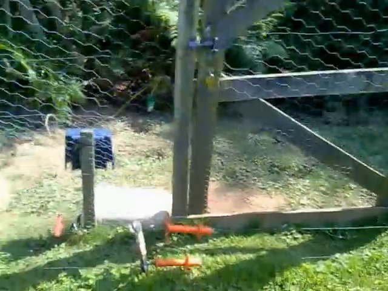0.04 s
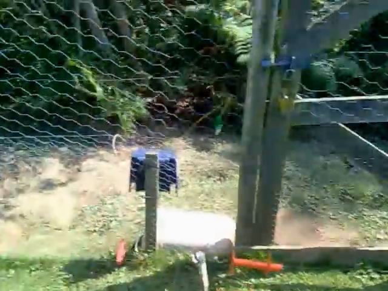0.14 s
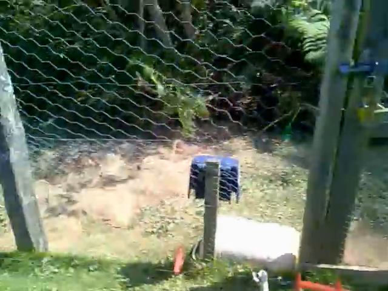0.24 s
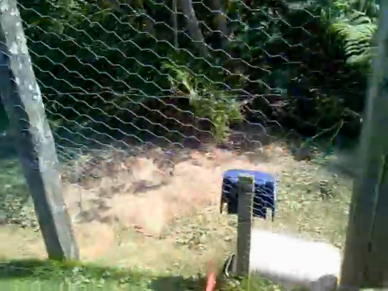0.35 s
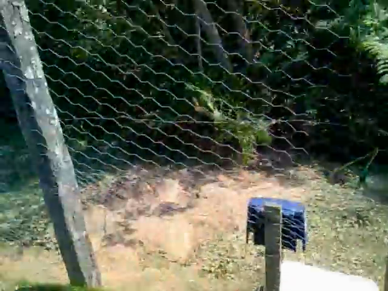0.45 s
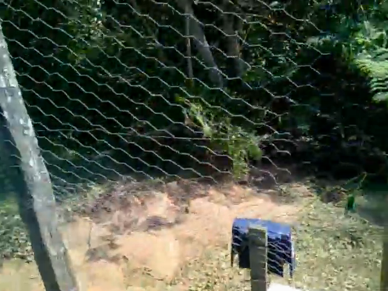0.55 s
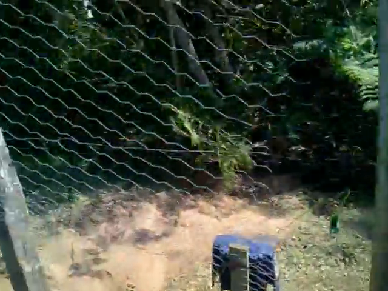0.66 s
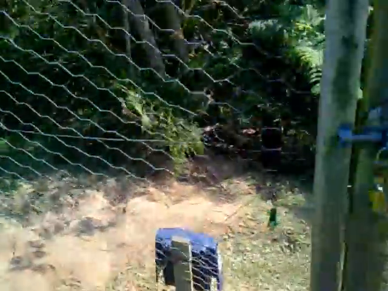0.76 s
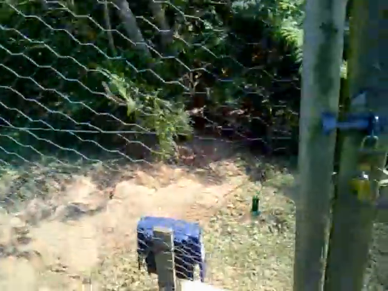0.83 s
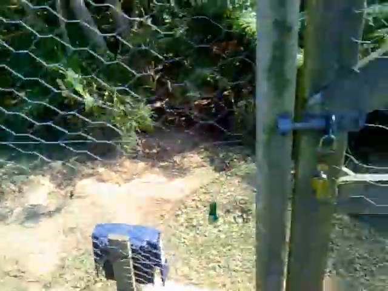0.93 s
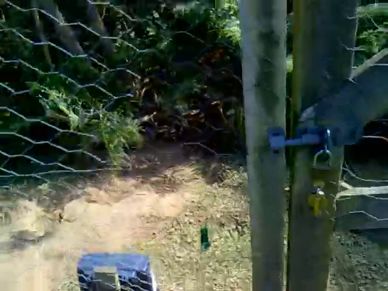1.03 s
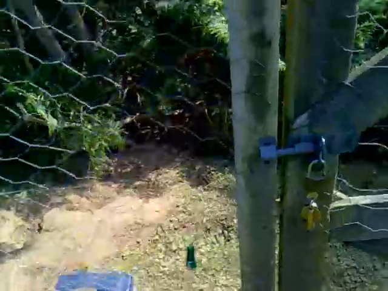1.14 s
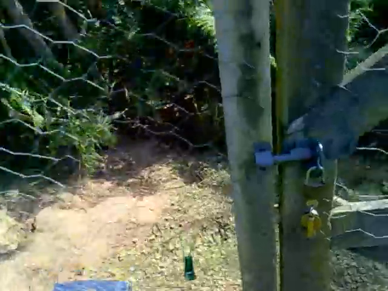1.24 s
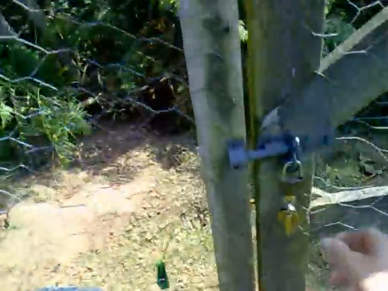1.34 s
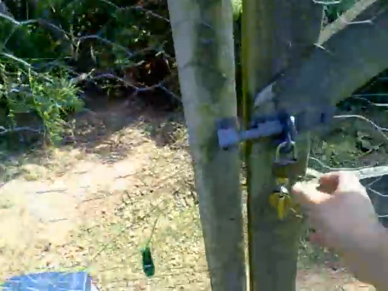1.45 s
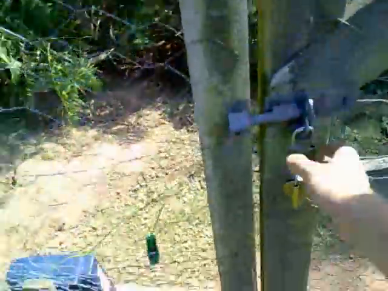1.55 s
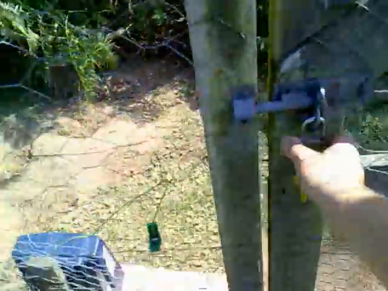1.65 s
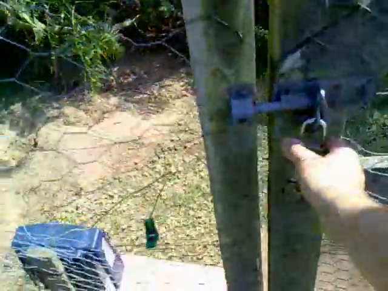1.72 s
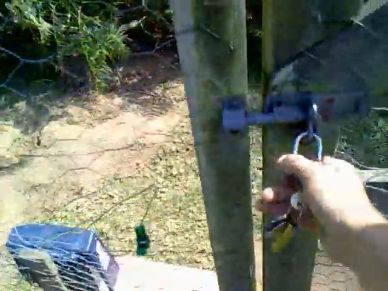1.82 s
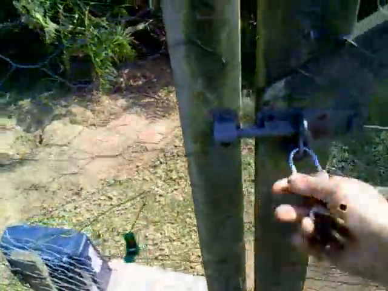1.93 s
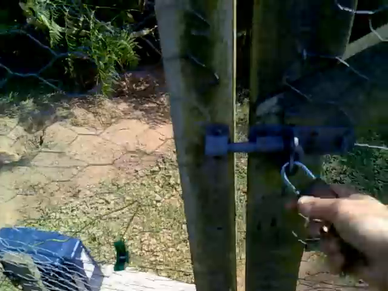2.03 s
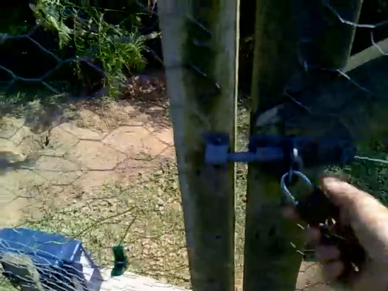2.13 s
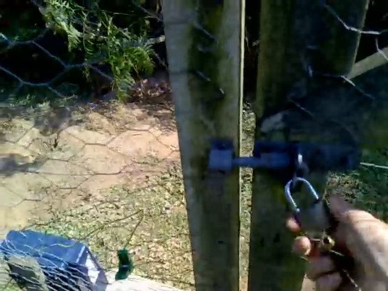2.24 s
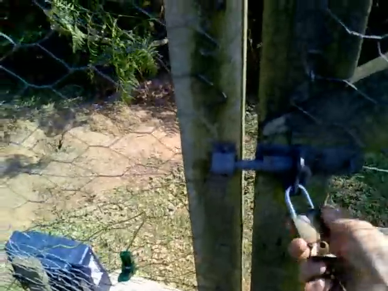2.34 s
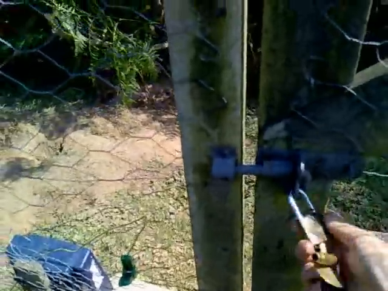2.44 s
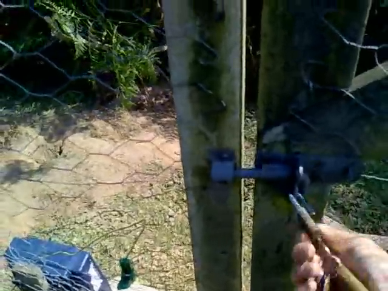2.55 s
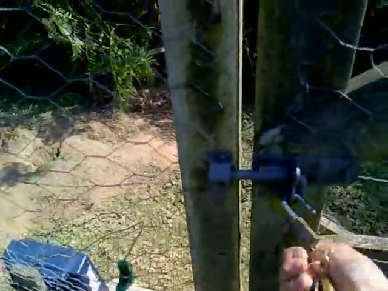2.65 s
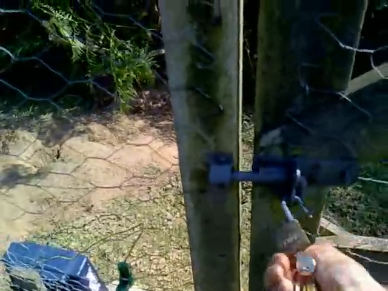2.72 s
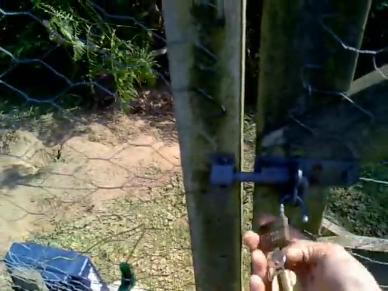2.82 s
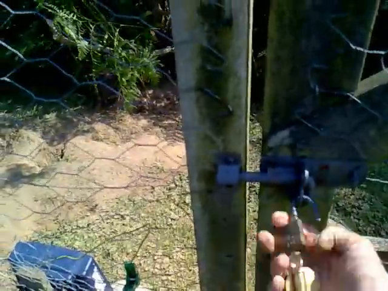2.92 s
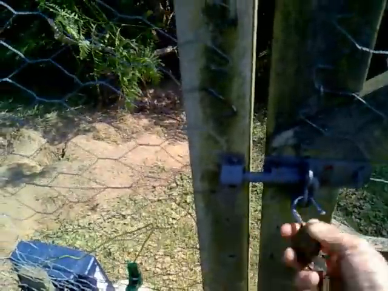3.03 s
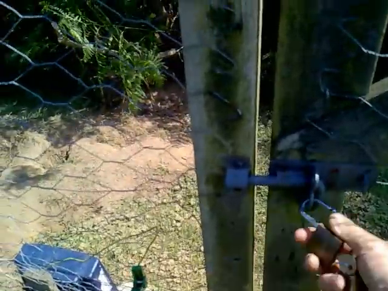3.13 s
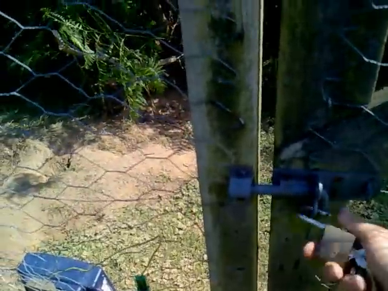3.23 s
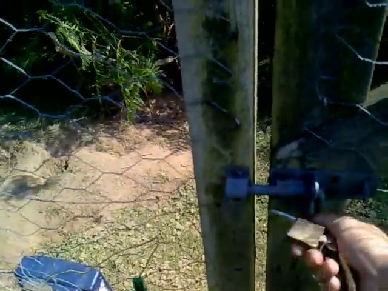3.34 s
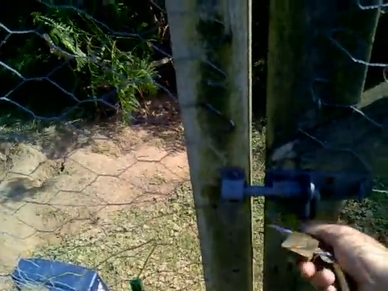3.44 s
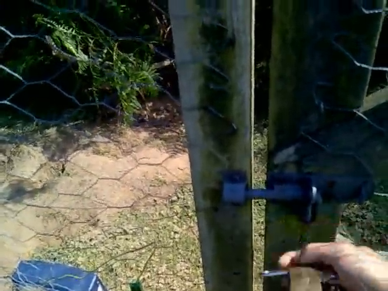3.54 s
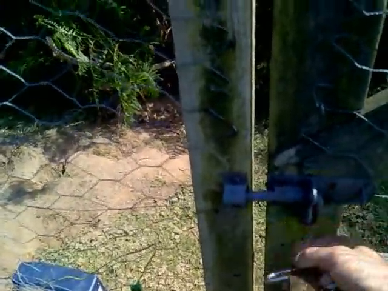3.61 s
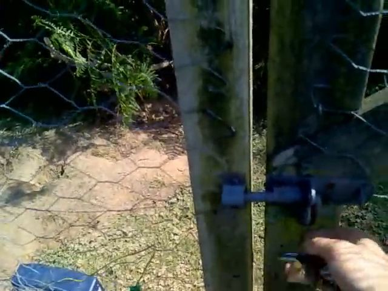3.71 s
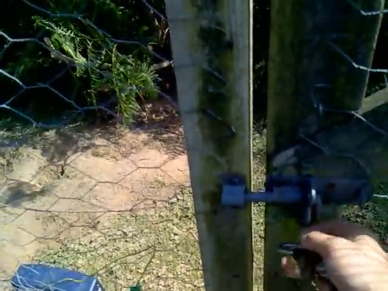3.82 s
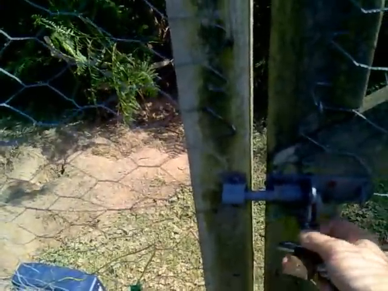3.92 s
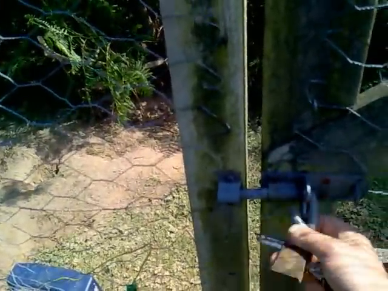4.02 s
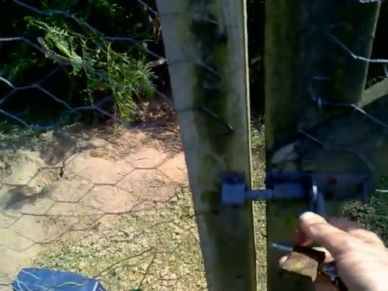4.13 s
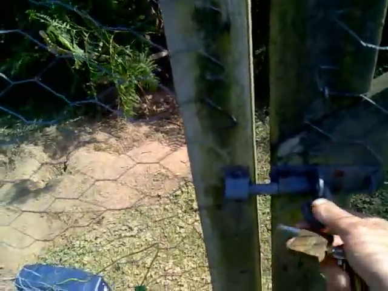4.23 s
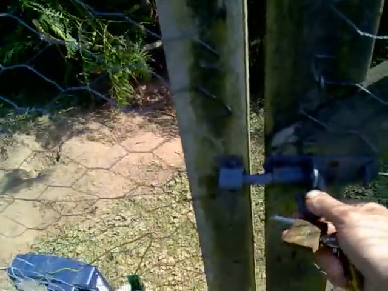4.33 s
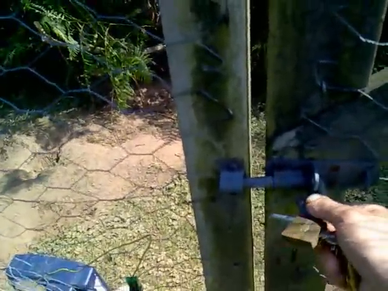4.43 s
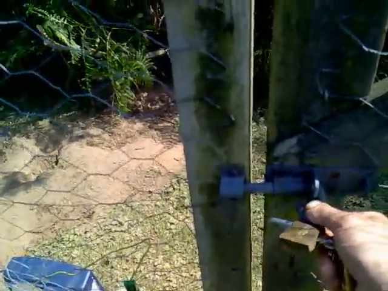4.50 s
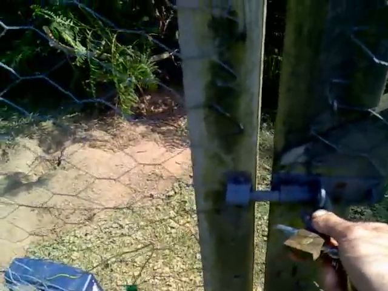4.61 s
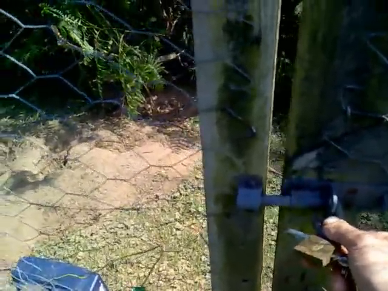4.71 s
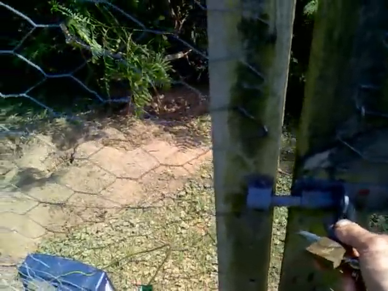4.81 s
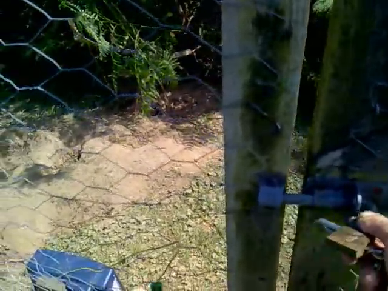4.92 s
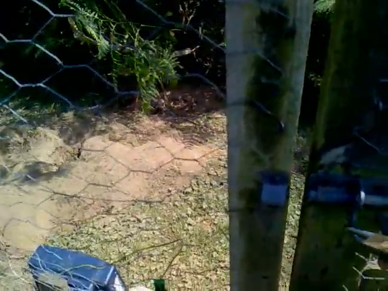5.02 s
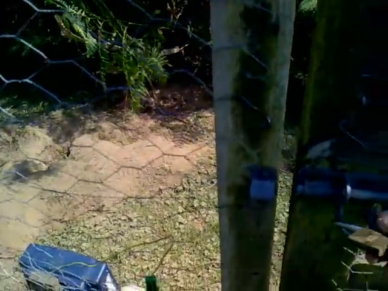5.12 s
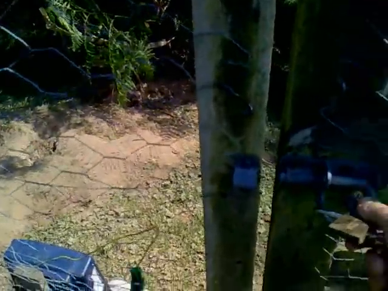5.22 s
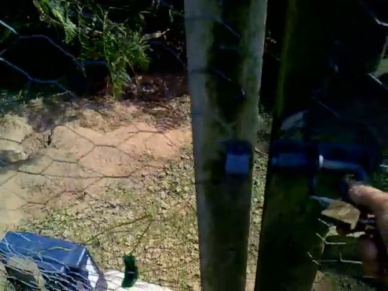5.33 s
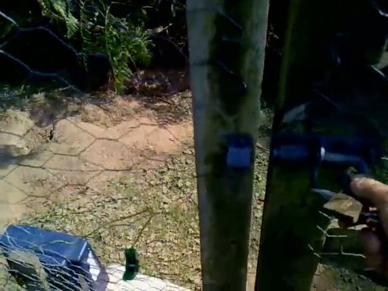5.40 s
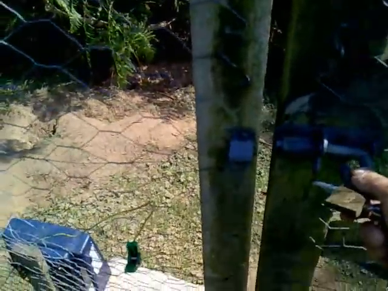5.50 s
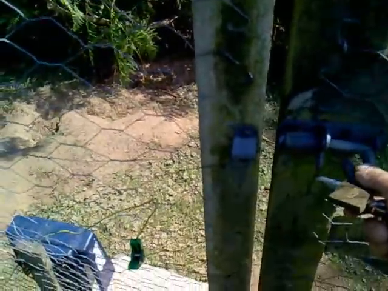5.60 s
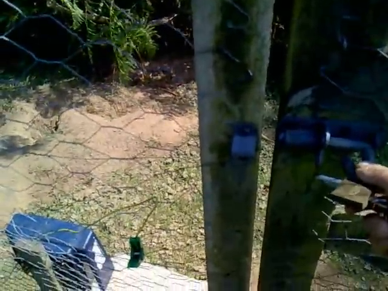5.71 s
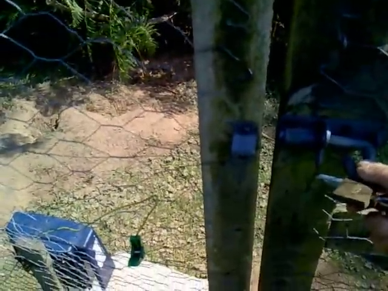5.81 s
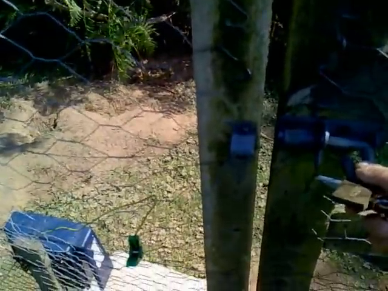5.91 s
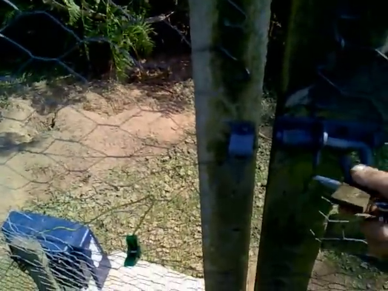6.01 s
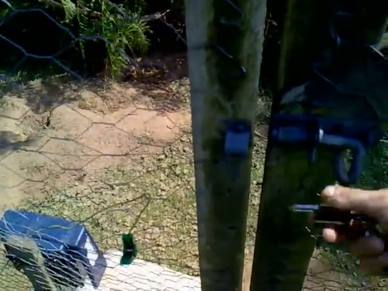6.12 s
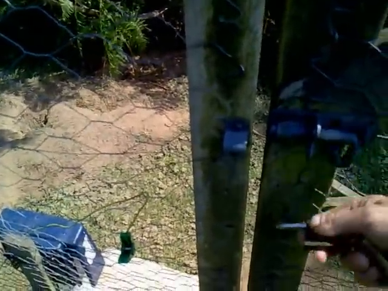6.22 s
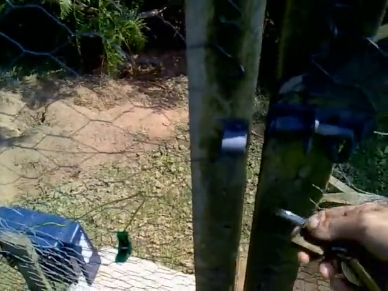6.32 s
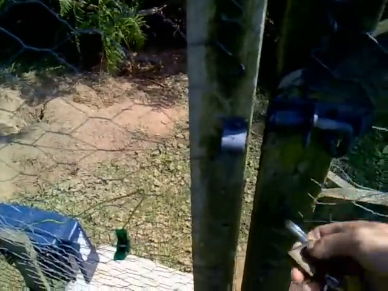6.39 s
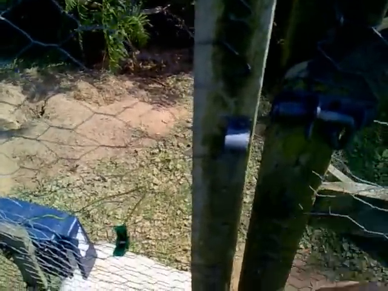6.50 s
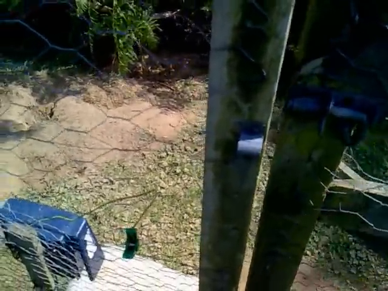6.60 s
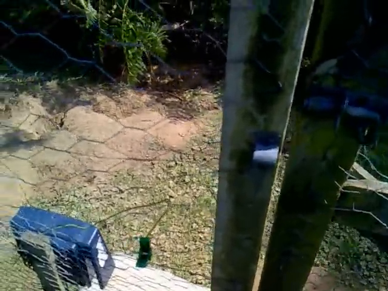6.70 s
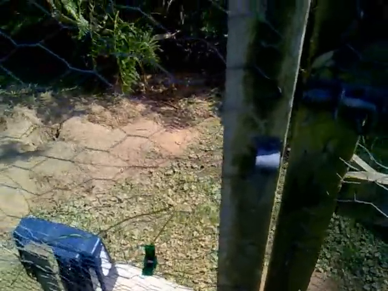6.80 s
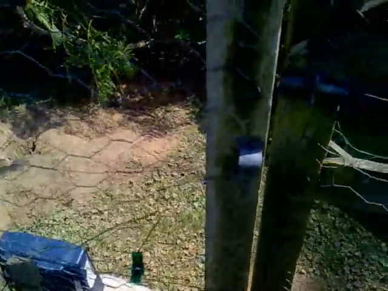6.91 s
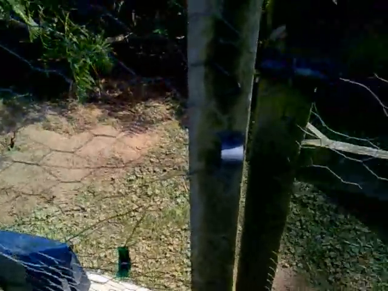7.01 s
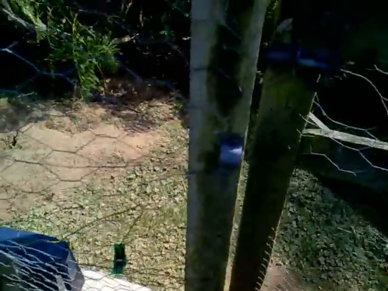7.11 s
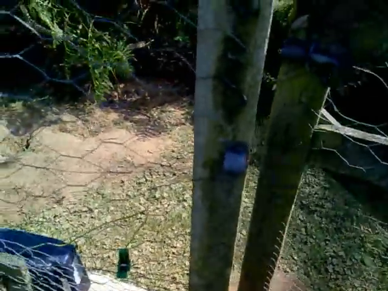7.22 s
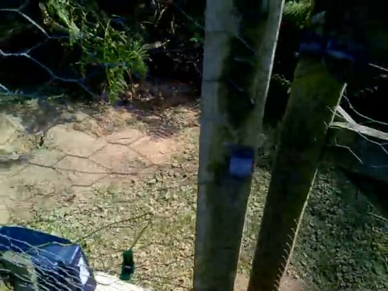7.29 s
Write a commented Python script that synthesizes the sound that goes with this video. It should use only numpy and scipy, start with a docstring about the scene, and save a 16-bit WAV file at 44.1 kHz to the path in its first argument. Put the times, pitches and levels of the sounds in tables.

```python
"""Padlocked garden gate

Someone walks through grass to a wooden gate, unhooks a padlock with dangling keys and slams the bolt open.
Steel knocks and clicks are short cracks over dying modes; steel scrapes and shivers of wire are trains of tiny slips.
The wire netting also buzzes on as noise fed by the energy of each shake.
Shaped noise makes the footsteps, garden hiss and wind; a camera case ticks and a thin whine slides upward."""
import sys
import numpy as np
from scipy import signal
from scipy.fft import rfft, irfft
from scipy.io import wavfile
from scipy.ndimage import uniform_filter1d

SR = 44100
rng = np.random.default_rng(int(sys.argv[2]) if len(sys.argv) > 2 else 0)


def to_wav(sig):
    """Store sig (one row per channel, or 1-D mono) as 16-bit WAV at the path in sys.argv[1].

    Samples outside -1..1 are clipped; the rate is SR.
    """
    pcm = np.clip(np.atleast_2d(sig), -1, 1) * 32767
    pcm = np.round(pcm).astype(np.int16)
    wavfile.write(sys.argv[1], SR, pcm.T)  # frames by channels


N = 324122
T = np.arange(SR // 2) / SR  # time axis of one struck sound, s

# quiet garden hiss, and wind on the microphone: f/Hz, level/dB (per Hz)
HISS_SPECTRUM = [(50, -16.5), (100, -3.5), (160, -13), (250, -3), (420, -8.5), (800, -16), (1300, -16),
                 (2300, -19.5), (5000, -21.5), (12000, -22.5), (16000, -22)]
WIND_SPECTRUM = [(10, -5), (25, 3.5), (60, -4), (100, -15), (170, -28.5), (350, -34), (1000, -69),
                 (4000, -100)]
# puffs of wind hit the microphone: peak t/s, level/dB, time constant of the fall t/s
WIND_PUFFS = [(0.28, -32.5, 0.039), (0.352, -26.5, 0.054), (0.47, -29, 0.035), (0.712, -51.5, 0.072),
              (0.82, -42.5, 0.038), (0.943, -38, 0.077), (1.18, -50.5, 0.084), (1.443, -54, 0.053),
              (2.56, -39.5, 0.0081), (2.668, -37.5, 0.04), (4.438, -55.5, .025), (6.8, -45, .04)]
# light breeze between the puffs: t/s, level/dB
BREEZE_LEVEL = [(1.6, -76), (2.95, -60), (3.96, -79.5), (5.23, -73), (5.62, -76.5), (7.3, -69)]
PUFF_RISE_SHARE = 0.51  # a puff builds faster than it dies

# level of each whine sweep: level/dB
WHINE_LEVELS = [-80, -80, -73.5, -83.5, -82, -91, -82]
WHINE_FIRST_END_S, WHINE_PERIOD_S, WHINE_LENGTH_S = 0.58, 1.178, 0.51

# bolt knocks in its guides: t/s, level/dB (middle band), hardness/dB (treble against middle), clank f/Hz
BOLT_KNOCKS = [(0.124, -60.5, -36.5, 1560), (1.626, -59.5, -44, 1350), (2.0989, -36.5, -12, 2600),
               (2.4297, -48.5, -12, 2070), (2.446, -50, -8, 1131), (2.976, -42.5, -10.5, 1150),
               (3.039, -21, -5, 4400), (3.137, -31, -31.5, 2330), (3.359, -37.5, -15, 2337),
               (3.398, -30, 2, 2267), (3.4358, -40.5, -9, 3344), (3.451, -37.5, -21, 1100),
               (3.474, -46, -30, 1325), (4.0581, -25.5, -17.5, 2355), (4.092, -33, -32, 2450),
               (4.098, -30, -32, 2450), (4.1243, -38, -32, 1790), (4.151, -46, -51, 1380),
               (4.1966, -37, -46, 2500), (4.2743, -39, -36, 2100), (5.018, -53.5, -22.5, 867),
               (5.04, -33.5, -19, 2445), (5.053, -25.5, -19.5, 2293), (5.1126, -9.5, -17, 2296),
               (5.1214, -7, -12, 3443), (5.1265, -7.5, -19.5, 643), (5.137, -14.5, -12, 2400),
               (5.213, -33, -30, 2190), (5.657, -53.5, -12, 1152), (6.2725, -31.5, -10.5, 1134),
               (6.283, -35, -17, 1340), (6.298, -30.5, -14, 1386)]
# modes of the gate: f/Hz, level/dB, t60/s
GATE_MODES = [(434.3, -12.5, 0.12), (627, -9.5, .11), (708, -11, 0.16), (954, -9, .08), (1153, -8, 0.18),
              (1363, -4.5, 0.13), (1510, -13.5, .12), (1900, -15, .15), (2045, -1.5, 0.13), (2220, -4, .1),
              (2439, 2.5, .08), (2810, -14.5, .1), (2940, -15, 0.23), (3120, -15, 0.092),
              (3300, -12.5, .12), (3871, -12.5, 0.034), (6200, -24, .09), (6966, -24, .09),
              (8700, -21, 0.086), (10500, -31.5, .15)]
# crowded resonance of the timber frame: f/Hz, level/dB (per Hz)
TIMBER_SPECTRUM = [(60, -34.5), (150, -26), (280, -15), (420, -2.5), (700, -4.5), (1100, 1.5), (1650, -1),
                   (2400, 3), (3800, -3.5), (5000, -9.5), (8000, -18.5), (12000, -32), (16000, -38)]
# decay of the timber frame: f/Hz, t60/s
FRAME_DECAY = [(150, .16), (500, .13), (1400, 0.12), (3700, 0.064), (10000, 0.033)]
# timber bass against the knock's strength: more for a soft blow and for a low clank
TIMBER_DB, TIMBER_PER_HARDNESS, TIMBER_DB_PER_OCTAVE, MID_CLANK_HZ = -7, -0.1, -3.5, 1700
# ring against the crack: the hand damps the bolt until it lets go
LET_GO_S, HELD_RING_DB, FREE_RING_DB = 6.1, -6.5, 19

# decay of the wire netting: f/Hz, t60/s
NETTING_DECAY = [(200, 0.45), (600, 0.78), (2500, .6), (6000, 0.54), (14000, 0.66)]
# tone of the netting against the energy that feeds it: f/Hz, level/dB
NETTING_TONE = [(100, 0), (500, 1.57), (1200, -0.67), (2300, -1.45), (4000, -0.89), (8000, 1.3),
                (16000, -1.5)]
# the wire spills a share of every shake into all pitches, less into the treble
SPILL_DB, SPILL_DB_PER_OCTAVE, SPILL_HZ = -6, -3, 4000

# feet brush the grass: start t/s, end t/s, level/dB, brightness/dB per octave
FOOTSTEPS = [(0.182, 0.492, -57, 0.5), (0.444, 0.688, -64, 1), (0.701, 0.794, -61.5, 0),
             (0.874, 1.14, -60, 2), (1.125, 1.223, -63, 0.5)]
# brushed grass: f/Hz, level/dB (per Hz)
GRASS_SPECTRUM = [(100, 7.5), (400, 2.5), (3500, -9.5), (6500, -16.5), (10500, -14), (16000, -19)]

# camera case ticks: t/s, level/dB (middle band), hardness/dB (treble against middle)
CASE_TICKS = [(0.2078, -31.5, -9), (0.389, -69, 7), (0.518, -65.5, 7), (0.8214, -52.5, -28.5),
              (1.419, -75.5, 5), (7.109, -47, -24.5)]
# modes of the plastic case: f/Hz, level/dB, t60/s
CASE_MODES = [(676, -24.5, 0.017), (1090, -14.5, 0.0084), (1486, -4.5, 0.011), (2350, -2.5, 0.0036),
              (3770, -16, 0.012), (4670, -0.5, 0.0024), (8800, -17, 0.0024), (13000, -10.5, 0.00047)]
CASE_BASS_DB, CASE_BASS_PER_HARDNESS = -5.5, -0.56

# padlock and shackle clicks: t/s, level/dB (middle band), contact length t/s
LOCK_CLICKS = [(0.831, -53, 0.03), (1.8179, -48, 0.021), (2.013, -56.5, 0.014), (2.071, -25, 0.0006),
               (2.088, -37.5, 0.0099), (2.145, -45, 0.002), (2.2667, -48.5, 0.0008), (3.039, -27.5, 0.0026),
               (3.19, -51, .0096), (3.289, -30.5, 0.0026), (3.554, -60, 0.0022), (4.365, -57, 0.016),
               (5.542, -56, .0042), (6.36, -55, 0.011), (6.716, -59.5, .012), (6.827, -62, 0.0016)]
# modes of the padlock: f/Hz, level/dB, t60/s
LOCK_MODES = [(2390, 6, 0.031), (2970, -2.5, .02), (4320, -9, .016), (5360, 4, 0.02), (6100, -6, .026),
              (7500, -3, 0.0142), (8460, -2.5, .15), (9100, -6.5, 0.026), (11200, -16.5, 0.022),
              (11600, -29.5, .04), (12500, -3, 0.012), (14810, -13, 0.033)]
# chatter of small steel parts: f/Hz, level/dB (per Hz)
STEEL_SPECTRUM = [(100, -22.5), (400, -6.5), (1200, -7.5), (2400, 2), (5500, 3), (8500, -0.5),
                  (12000, -9.5), (16000, -12)]
# a contact of CONTACT_S has this bass and treble against the middle; each doubling makes it duller
CONTACT_S, CLICK_BASS_DB, CLICK_TREBLE_DB = 0.0033, -13.5, -4
BASS_DB_PER_DOUBLING, TREBLE_DB_PER_DOUBLING = 2, -2.5
# ring against the crack, before and after the shackle comes free
UNHOOK_S, HOOKED_RING_DB, UNHOOKED_RING_DB = 3.15, -24, -10

# rasping noises: steel slides, and the long fading ones are wire netting shivering on:
# start t/s, end t/s, start level/dB, end level/dB
RASPS = [(1.826, 2.062, -51, -65), (2.116, 2.33, -48, -72), (2.438, 2.484, -44.5, -57.5),
         (2.657, 2.85, -48, -66), (2.95, 2.989, -43.5, -38.5), (3.122, 3.134, -49.5, -42),
         (3.315, 3.408, -43, -35), (3.411, 3.477, -38.5, -50.5), (4.083, 4.127, -41, -38),
         (5.055, 5.11, -31.5, -25), (6.21, 6.277, -59.5, -53.5), (6.892, 6.969, -68, -65.5)]
# ringing modes mixed into the rasp: f/Hz, level/dB, t60/s
ROD_MODES = [(1134, -0.5, 0.016), (2155, -2.5, 0.019), (2260, -4, 0.026), (3100, -13.5, 0.033),
             (7600, -21, 0.023), (8400, -29, 0.084)]
# grit of one slip: f/Hz, level/dB (per Hz)
RASP_SPECTRUM = [(100, -31.5), (300, -10), (520, 3), (1000, 3), (1700, -1), (2400, -1.5), (3500, -4.5),
                 (5000, -15.5), (8000, -27), (16000, -37)]
# a rasp at this level rings the modes as strongly as the grit; lighter ones ring them less
ROD_RINGS_AT_DB, ROD_PER_RASP = -32, 0.4
TILT_PER_RASP = -0.0095  # dB an octave for each dB of level: a light rasp is brighter
SLIP_SWELL_DB = 3

# keys clink: t/s, level/dB (middle band), key (0 is the first key, 1 and 2 both sound the second)
KEY_CLINKS = [(2.449, -54, 1), (2.501, -57, 1), (2.604, -57.5, 1), (2.6519, -25.5, 0), (2.7195, -48, 1),
              (2.729, -50, 1), (2.8482, -35.5, 1), (2.976, -54.5, 1), (6.484, -71, 2), (6.512, -64.5, 2),
              (6.562, -72, 2)]
# modes of each key, of which the first two keys are played: f/Hz, level/dB, t60/s
KEY_MODES = [
    [(3645, -10, 0.092), (4040, -17, 0.037), (5200, -32, 0.055), (6086, -13.5, 0.011), (8670, -17, .1),
     (8470, -27, 0.029), (14300, -28, 0.0097)],
    [(2450, -3.5, .014), (3790, -3.5, 0.014), (5550, -10, 0.013), (8760, -7, 0.012), (10060, -11.5, 0.038),
     (14770, -13, 0.038), (15440, -13, 0.035)],
    [(2870, -5, .2), (4258, -7, .15), (4420, -2, .08), (6008, -14, .15)],
]
KEY_BASS_DB, KEY_TREBLE_DB = -21, [-15, 0]  # against the middle; one treble for each key
# the bunch of keys jiggles in the hand: start t/s, end t/s, level/dB (middle band, average touch)
KEY_JIGGLES = [(2.471, 2.945, -66)]
JIGGLES_PER_S, JIGGLE_SPREAD_DB = 22, 3


def amp(db):
    """Decibels to gain."""
    return 10 ** (np.asarray(db) / 20)


def unit(x):
    """Scales to rms 1."""
    return x / np.sqrt(np.mean(x ** 2) + 1e-24)


def noise(size):
    """White noise."""
    return rng.standard_normal(size)


def read(points, hz):
    """Reads a table on a log-frequency axis."""
    f, value = np.transpose(points)
    return np.interp(np.log(hz + 1), np.log(f), value)


def add(mix, s, sound):
    """Mixes a sound in at time s."""
    part = mix[round(s * SR):][:len(sound)]
    part += sound[:len(part)]


def colour(x, spectrum, tilt_db=0):
    """Gives x a spectrum, tilted by so many dB an octave, at rms 1."""
    hz = np.fft.rfftfreq(len(x), 1 / SR)
    gain_db = read(spectrum, hz) + tilt_db * np.log2(hz + 100)
    return unit(irfft(rfft(x) * amp(gain_db), len(x)))


def cut(x, hz, kind):
    """Fourth-order crossover filter: a second-order Butterworth run twice."""
    once = signal.butter(2, hz, kind, fs=SR, output="sos")
    return signal.sosfilt(np.tile(once, (2, 1)), x)


def fade(x, t60s):
    """Lets each band die at its own speed."""
    hz, t, z = signal.stft(x, SR, nperseg=256)
    decay = amp(-60 * t / read(t60s, hz)[:, None])
    return signal.istft(z * decay, SR)[1][:len(x)]


def ring(modes, spread_db):
    """Dying sine modes; the spot that is struck favours some of them."""
    hz, db, t60 = np.transpose(modes)[:, :, None]
    size = amp(db + spread_db * noise(db.shape)) * rng.choice([-1, 1], db.shape)
    decay = np.exp(-np.log(1000) * T / t60)
    return (size * decay * np.sin(2 * np.pi * hz * T)).sum(0) / np.linalg.norm(size)


def voiced(x, levels_db):
    """The hardness of a contact sets the low, middle and treble level of its first 10 ms."""
    upper = cut(x, 1300, "high")
    bands = cut(x, 1300, "low"), cut(upper, 5500, "low"), cut(upper, 5500, "high")
    return sum(amp(db) * band / np.std(band[:SR // 100]) for db, band in zip(levels_db, bands))


def crack(hold, release):
    """Level of a short hard crack while the parts touch."""
    attack = 1 - np.exp(-T / 0.0009)
    return attack * np.exp(-np.maximum(T - hold, 0) / release)


def air():
    """Quiet garden hiss, and a light breeze whose puffs swell and die on the microphone."""
    t = np.arange(N) / SR
    power = amp(np.interp(t, *np.transpose(BREEZE_LEVEL))) ** 2
    for s, db, length in WIND_PUFFS:
        away = np.maximum((s - t) / PUFF_RISE_SHARE, t - s) / length
        power = power + (amp(db) * np.exp(-away)) ** 2
    hiss = amp(-67) * colour(noise(N), HISS_SPECTRUM)
    return hiss + np.sqrt(power) * colour(noise(N), WIND_SPECTRUM)


def whine(top_hz=12270, rise_hz_per_s=750, wobble_hz=25):
    """A faint, slightly unsteady tone that climbs to the same pitch at even intervals."""
    out, t = np.zeros(N), np.arange(0, WHINE_LENGTH_S, 1 / SR)
    for k, db in enumerate(WHINE_LEVELS):
        wobble = wobble_hz * unit(uniform_filter1d(noise(len(t)), 200))
        hz = top_hz - rise_hz_per_s * (WHINE_LENGTH_S - t) + wobble
        tone = unit(np.sin(2 * np.pi * np.cumsum(hz) / SR))
        start = WHINE_FIRST_END_S + k * WHINE_PERIOD_S - WHINE_LENGTH_S
        add(out, start, amp(db) * tone * signal.windows.tukey(len(t), 0.25))
    return out


def bolt(clank_t60=0.026):
    """Each knock rings the gate's modes, the crowded timber frame, and one clank set by the spot struck."""
    out = np.zeros(N)
    for s, db, hard_db, clank_hz in BOLT_KNOCKS:
        ring_gain = amp(HELD_RING_DB if s < LET_GO_S else FREE_RING_DB)
        clank_octaves = np.log2(clank_hz / MID_CLANK_HZ)
        timber_db = TIMBER_DB + TIMBER_PER_HARDNESS * hard_db + TIMBER_DB_PER_OCTAVE * clank_octaves
        frame = fade(colour(noise(len(T)), TIMBER_SPECTRUM), FRAME_DECAY)
        clank = ring([(clank_hz, 0, clank_t60)], spread_db=0)
        body = frame + amp(-4) * ring(GATE_MODES, spread_db=7) + amp(6.5) * clank
        # the heavy frame takes up the bass slowly and holds it longer than the steel holds the treble
        bass_level = (1 - np.exp(-T / 0.0015)) * (crack(hold=0.009, release=0.01) + amp(8) * ring_gain)
        treble_level = crack(hold=0.0012, release=0.0018) + ring_gain
        knock = cut(body, 980, "low") * bass_level + cut(body, 430, "high") * treble_level
        add(out, s, amp(db) * voiced(knock, (timber_db, 0, hard_db)))
    return out


def netting(x):
    """Loose wire buzzes on with the energy of each shake, which it spreads over neighbouring pitches."""
    hz, t, z = signal.stft(x, SR, nperseg=256)
    spread = uniform_filter1d(abs(z) ** 2, size=7, axis=0)
    shake = abs(uniform_filter1d(spread, size=7, axis=0))  # abs guards against rounding below zero
    spill_db = SPILL_DB + SPILL_DB_PER_OCTAVE * np.log2(1 + hz / SPILL_HZ)
    shake = shake + shake.mean(0) * amp(spill_db)[:, None] ** 2
    keep = amp(-120 * t[1] / read(NETTING_DECAY, hz))  # energy kept from one frame to the next
    energy = np.array([signal.lfilter([0, 0, 1 - k], [1, -k], band) for k, band in zip(keep, shake)])
    buzz = signal.stft(unit(noise(N)), SR, nperseg=256)[2]
    buzz *= amp(1.6 * unit(uniform_filter1d(noise(z.shape), size=14, axis=1)))  # single strands flare up
    buzz *= np.sqrt(energy) * amp(read(NETTING_TONE, hz))[:, None] / np.std(buzz)
    return signal.istft(buzz, SR)[1][:N]


def steps():
    """Soft swells of fine crackle: noise with random louder grains, coloured like brushed grass."""
    out = np.zeros(N)
    for start, end, db, tilt_db in FOOTSTEPS:
        size = round((end - start) * SR)
        blades = noise(size) * amp(3.2 * np.minimum(rng.exponential(1, size), 5))
        swish = colour(blades, GRASS_SPECTRUM, tilt_db)
        add(out, start, amp(db) * swish * signal.windows.tukey(size, 0.7))
    return out


def case():
    """Dry, thin plastic modes tick right at the microphone; the softer, the more bass."""
    out = np.zeros(N)
    for s, db, hard_db in CASE_TICKS:
        bass_db = CASE_BASS_DB + CASE_BASS_PER_HARDNESS * hard_db
        tick = cut(ring(CASE_MODES, spread_db=2), 336, "high")
        add(out, s, amp(db) * voiced(tick, (bass_db, 0, hard_db)))
    return out


def padlock():
    """Bright clicks, duller the longer the contact; a free shackle sings on."""
    out = np.zeros(N)
    for s, db, length in LOCK_CLICKS:
        ring_db = HOOKED_RING_DB if s < UNHOOK_S else UNHOOKED_RING_DB
        doublings = np.log2(length / CONTACT_S)
        bass_db = CLICK_BASS_DB + BASS_DB_PER_DOUBLING * doublings
        treble_db = CLICK_TREBLE_DB + TREBLE_DB_PER_DOUBLING * doublings
        chatter_level = crack(length, release=0.00091) + amp(3) * np.exp(-T / 0.0057)
        chatter = colour(noise(len(T)), STEEL_SPECTRUM) * chatter_level
        modes = ring(LOCK_MODES, spread_db=2.5) * (crack(length, release=0.0041) + amp(ring_db))
        add(out, s, amp(db) * voiced(amp(-13) * chatter + modes, (bass_db, 0, treble_db)))
    return out


def rasps(slips_per_s=800):
    """Sliding steel and shivering wire: uneven tiny slips excite grit and the rod's ringing modes."""
    out = np.zeros(N)
    for start, end, start_db, end_db in RASPS:
        press_db = (start_db + end_db) / 2 - ROD_RINGS_AT_DB
        size = max(round((end - start) * SR), 64)
        # steady fine noise under sparse strong slips
        slips = noise(size) * (0.13 + (rng.random(size) < slips_per_s / SR))
        # the contact catches and lets go
        slips *= amp(SLIP_SWELL_DB * unit(uniform_filter1d(noise(size), size=250)))
        grit = colour(noise(len(T)), RASP_SPECTRUM, TILT_PER_RASP * press_db) * np.exp(-T / 0.0039)
        rod = amp(ROD_PER_RASP * press_db) * unit(ring(ROD_MODES, spread_db=3))
        body = unit(grit) + rod
        drive = unit(slips) * amp(np.linspace(start_db, end_db, size))
        add(out, start, signal.fftconvolve(drive, body / np.linalg.norm(body)))
    return out


def clink(key, spread_db):
    """A key chimes with a few clean modes, which all shift together by a slight random detune."""
    tick = colour(noise(len(T)), STEEL_SPECTRUM) * np.exp(-T / 0.0024)
    modes = np.array(KEY_MODES[key]) * [1 + 0.005 * rng.standard_normal(), 1, 1]
    return voiced(ring(modes, spread_db) + amp(-12) * tick, (KEY_BASS_DB, 0, KEY_TREBLE_DB[key]))


def keys():
    """The keys clink, and touch faintly at random while the hand moves them."""
    out = np.zeros(N)
    for s, db, key in KEY_CLINKS:
        add(out, s, amp(db) * clink(min(key, 1), spread_db=5.5))
    for start, end, db in KEY_JIGGLES:
        for s in rng.uniform(start, end, round((end - start) * JIGGLES_PER_S)):
            touch = cut(clink(rng.integers(2), spread_db=5), 11000, "low")
            add(out, s, amp(db + JIGGLE_SPREAD_DB * rng.standard_normal()) * touch)
    return out


def scene():
    """The gate's hardware with its netting tail, over the sounds of the garden."""
    gate = cut(bolt() + rasps(), 115, "high")
    lock = padlock() + keys()
    tail = cut(netting(amp(-22) * gate + amp(-28) * lock), 140, "high")
    return (gate + lock + tail + case() + steps() + whine() + air())[None]


def record(dry, threshold_db=-17, recover_db_per_s=8):
    """Loud blows overload the input and pull the gain down, which recovers slowly; then the band limit."""
    clipped = 0.7 * dry / (0.7 ** 4 + dry ** 4) ** (1 / 4)
    clipped = dry + cut(clipped - dry, 60, "high")  # the overload adds crunch but no rumble
    smooth = np.exp(-1 / (0.016 * SR))
    power = signal.lfilter([1 - smooth], [1, -smooth], clipped[0] ** 2)
    power_db = 10 * np.log10(power + 1e-12)
    # peak hold that sinks at a steady rate
    fall = np.arange(N) * recover_db_per_s / SR
    held_db = np.maximum.accumulate(power_db + fall) - fall
    over_db = np.maximum(held_db - threshold_db, 0)
    # averaging over the samples just past eases the gain down
    ducked = clipped * amp(-0.9 * uniform_filter1d(over_db, 600, origin=299))
    band_limit = signal.firwin(255, 16100, window=("kaiser", 8), fs=SR)
    return signal.oaconvolve(ducked, band_limit[None], "same")


dry = scene()
out = record(dry)
to_wav(out)
```